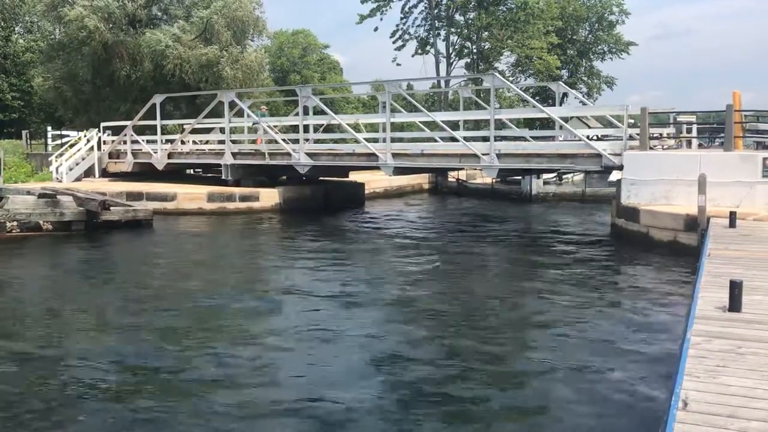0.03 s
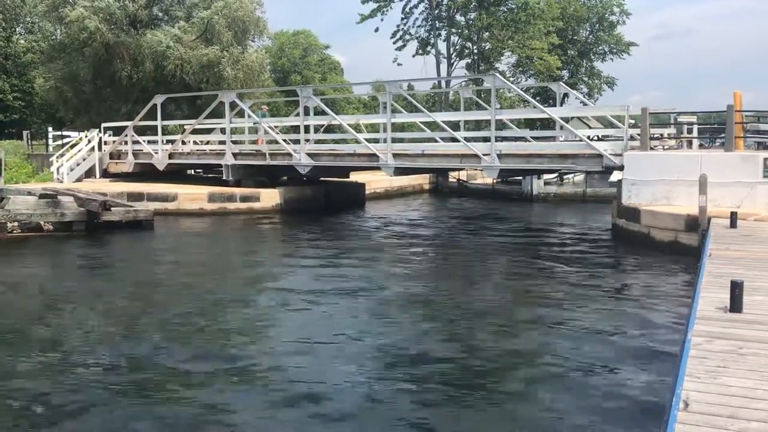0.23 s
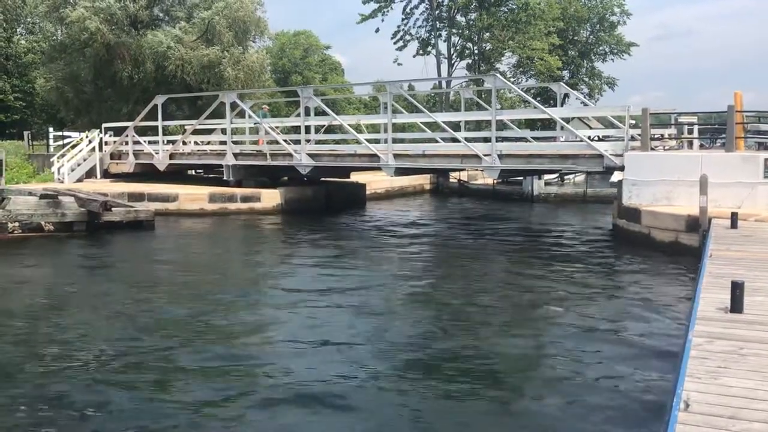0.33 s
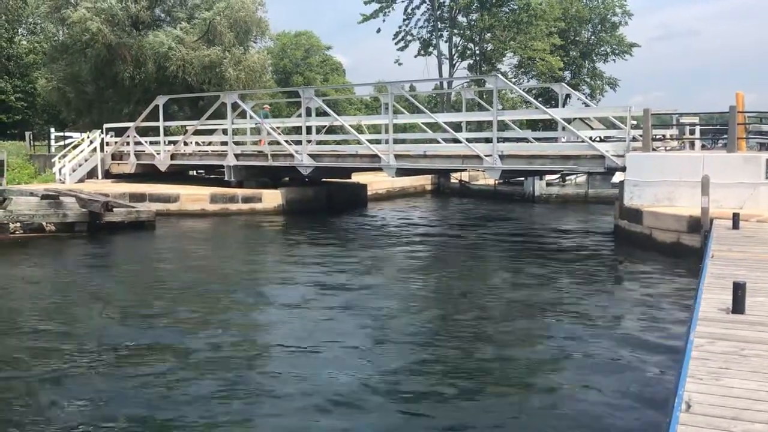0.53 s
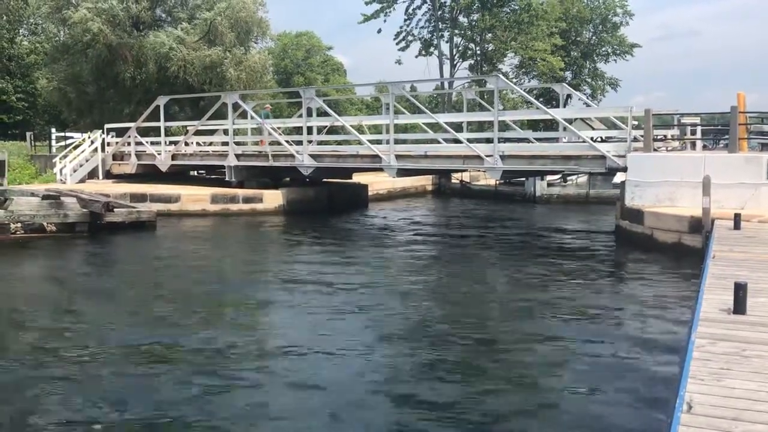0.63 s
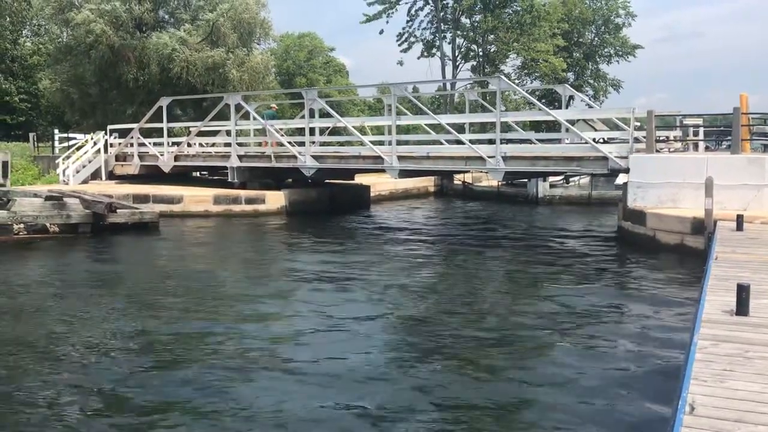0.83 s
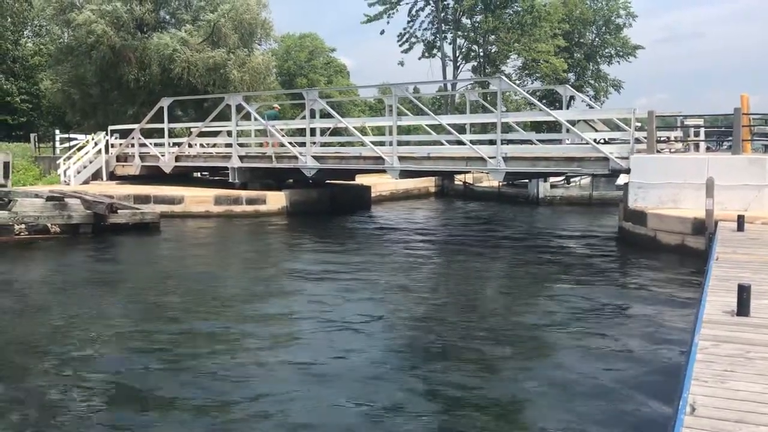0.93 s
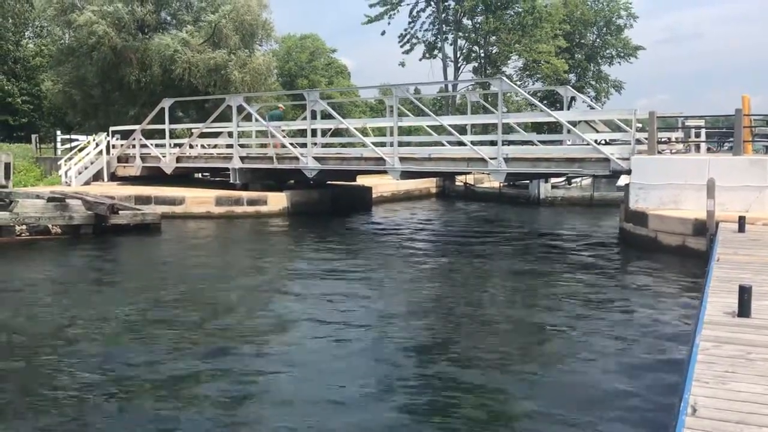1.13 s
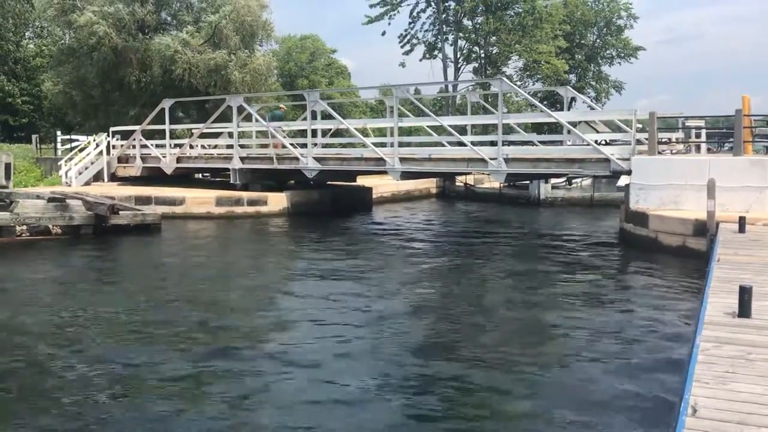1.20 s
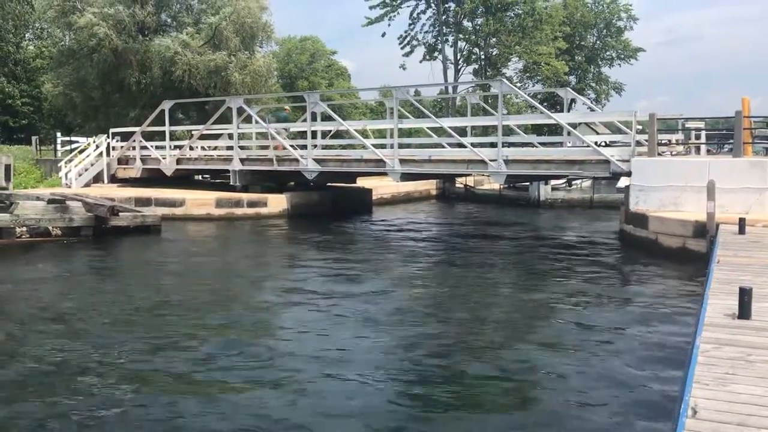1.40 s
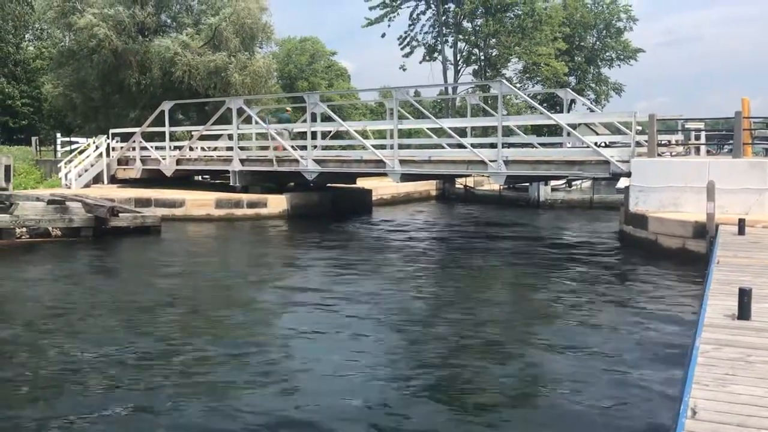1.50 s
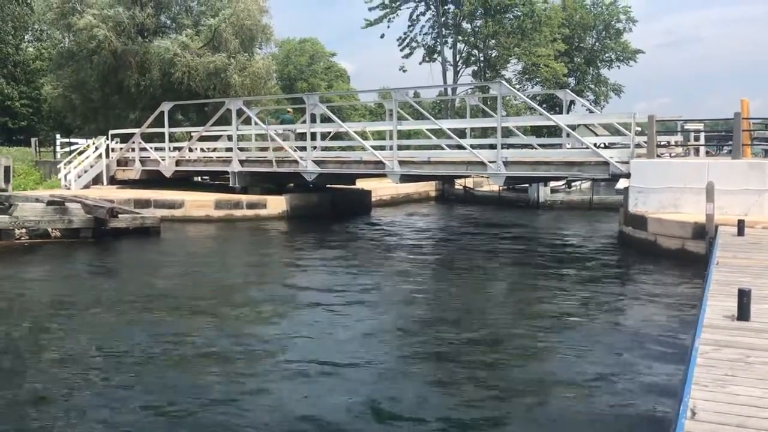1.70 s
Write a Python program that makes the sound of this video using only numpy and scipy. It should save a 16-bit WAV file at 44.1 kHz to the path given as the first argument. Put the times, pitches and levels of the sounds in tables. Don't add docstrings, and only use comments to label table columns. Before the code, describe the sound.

Metal bridge part slams shut with a clanging ring, bounces once, then small metal jingles and ticks

```python
import sys
import numpy as np
from scipy import signal
from scipy.fft import rfft, irfft
from scipy.io import wavfile
from scipy.ndimage import uniform_filter1d

SR = 44100
rng = np.random.default_rng(int(sys.argv[2]) if len(sys.argv) > 2 else 0)


def transcribe(signal):
    frames = np.atleast_2d(signal).T
    limited = np.clip(frames, -1, 1)
    pcm = np.round(limited * 32767).astype(np.int16)
    wavfile.write(sys.argv[1], SR, pcm)


def volts_from_db(level):
    exponent = np.asarray(level, float) / 20
    return 10 ** exponent


N = 77175


def rms_one(x):
    return x / np.sqrt(np.mean(x ** 2) + 1e-20)


def at_hz(points, hz):
    f, db = np.transpose(points)
    return np.interp(np.log(hz), np.log(f), db, left=-60, right=-60)


def curve(rows):
    return np.interp(np.arange(N) / SR, *np.transpose(rows))


def drift(rate):
    r = np.exp(-2 * np.pi * rate / SR)
    noise = rng.standard_normal(N + 20000)
    return rms_one(signal.lfilter([1], [1, -2 * r, r * r], noise)[20000:])


def since(s):
    return np.maximum(np.arange(N) / SR - s, 0)


def clicks_at(times, gains):
    out = np.zeros(N)
    out[(np.asarray(times) * SR).astype(int)] = gains
    return out


def dying(clicks, t60):
    return signal.lfilter([1], [1, -volts_from_db(-60 / (t60 * SR))], clicks)


def soften(level, seconds):
    smooth = np.exp(-1 / (seconds * SR))
    return signal.lfilter([1 - smooth], [1, -smooth], level)


def puff(rows, t60):
    return rng.standard_normal(N) * dying(clicks_at(rows[:, 0], volts_from_db(rows[:, 1])) + 1e-18, t60)


def ring(push, hz, t60):
    r, w = volts_from_db(-60 / (t60 * SR)), 2 * np.pi * hz / SR
    return signal.lfilter([0, np.sin(w)], [1, -2 * r * np.cos(w), r * r], push + 1e-18)


def band_pass(x, low, high):
    return signal.sosfilt(signal.butter(2, [low, high], "band", fs=SR, output="sos"), x)


def bands(streak_db=0):
    edges = 22 * 2 ** np.arange(0, 9.7, 1 / 3)
    white = rfft(rng.standard_normal((2, N)))
    streak_hz = 60
    ripple = uniform_filter1d(rng.standard_normal(white.shape), size=int(streak_hz * N / SR))
    strength = np.minimum(np.arange(N // 2 + 1) * SR / N / 1000, 1)
    white = irfft(white * volts_from_db(streak_db * rms_one(ripple) * strength), N)
    return [(np.sqrt(low * high), band_pass(white[k % 2], low, high))
            for k, (low, high) in enumerate(zip(edges, edges[1:]))]


def coloured(spectrum):
    return rms_one(sum(volts_from_db(at_hz(spectrum, hz)) * b for hz, b in bands()))


# t/s, level/dB, rise/s, decay scale
BLOWS = [
    (0.2316, -18, 0.005, 1),
    (0.3887, -26.5, 0.017, 0.94),
    (0.7, -47, 0.006, 2.36),
    (0.949, -36.5, 0.035, 1.11),
]


def dense_ring():
    # f/Hz, level/dB per Hz
    slam = [(110, -11.5), (200, -5), (600, -8), (1030, -1.5), (1730, -2.5), (2210, -6), (2800, -8),
            (3500, -9), (6500, -23.5), (12500, -31.5), (16000, -37)]
    bounce = [(200, -36), (800, -14.5), (1500, -1), (2200, -1), (3100, 0), (5400, -9), (9000, -20),
              (15500, -84)]
    knock = [(500, -3), (1200, 5), (1900, -4), (3800, -0.5), (6000, -57)]
    last_knock = [(400, -31), (650, -5.5), (1240, -3.5), (1710, -10.5), (2200, -7), (4200, -13.5),
                  (7000, -23.5), (12000, -44)]
    # f/Hz, t60/s
    steel_t60 = [(150, 1.48), (350, 1.1), (700, 0.77), (1400, 0.65), (2800, 0.42), (5600, 0.45),
                 (11000, 0.29), (15000, 0.25)]
    crack_levels = [19, 19, -12, -10]
    low_lag_cycles, crack_s, crack_hz = 2.2, 0.012, 9800
    out, noise = 0, bands(streak_db=2.5)
    t60_hz, t60_s = np.transpose(steel_t60)
    colours = [slam, bounce, knock, last_knock]
    for (s, db, rise, scale), crack_db, colour in zip(BLOWS, crack_levels, colours):
        t = since(s)
        norm = np.sqrt(sum(volts_from_db(at_hz(colour, hz)) ** 2 * np.mean(b ** 2) for hz, b in noise))
        crack = volts_from_db(crack_db) * np.exp(-t / crack_s)
        for hz, b in noise:
            t60 = scale * np.interp(np.log(hz), np.log(t60_hz), t60_s)
            low_lag = low_lag_cycles / hz * 200 / (hz + 200)
            onset = 1 - np.exp(-t / (rise * 1000 / (hz + 1000) + low_lag))
            fall = volts_from_db(-60 * t / t60) + crack / (1 + (crack_hz / hz) ** 2)
            out = out + volts_from_db(db + at_hz(colour, hz)) / norm * onset * fall * b
    return out


def clear_modes():
    steel_hz = [999, 1054, 1175, 1280, 1404, 1611, 3320, 2040, 2105, 2228, 2455, 4190, 4565, 5500]
    mode_t60 = [0.053, 0.4, 0.58, 0.38, 0.56, 0.44, 0.14, 0.24, 0.14, 0.41, 0.36, 0.062, 0.16, 0.46]
    mode_db = [
        [-36, -23.5, -32, -30, -29.5, -34, -42, -29, -24, -30, -38, -48, -37, -42],
        [-53, -67, -43.5, -50, -39, -44.5, -50, -32, -29, -35, -33, -35, -34, -46],
        [-57, -50, -46.5, -43, -49.5, -47, -47, -54, -45.5, -47.5, -52, -38.5, -64, -59],
    ]
    struck = np.array(BLOWS)[[0, 1, 3], 0]
    out = 0
    for hz, t60, dbs in zip(steel_hz, mode_t60, np.transpose(mode_db)):
        swell = soften(dying(clicks_at(struck, volts_from_db(dbs)), t60), 0.011)
        tone = np.sin(2 * np.pi * (hz * np.arange(N) / SR + rng.random()))
        out = out + swell * volts_from_db(2.5 * drift(30)) * tone
    return out


def steel():
    return dense_ring() + clear_modes()


def answers():
    # t/s, peak level/dB, t60/s
    replies = [(.181, -53, 0.23), (.232, -12.5, 0.036), (.234, -13.5, 0.095), (.237, -16.5, 0.24),
               (0.24, -15.5, 0.17), (.248, -28.5, 0.22), (.258, -18.5, 0.04), (0.24, -37, .05),
               (0.27, -17, 0.049), (0.31, -27, 0.079), (0.27, -20, 0.063), (0.24, -27, 0.059),
               (.31, -19, .06), (.31, -36.5, 0.24), (.394, -19.5, 0.12), (.404, -19, 0.071),
               (0.41, -24, 0.066), (0.37, -43, 0.11), (.43, -35, 0.11), (.44, -37, 0.13), (0.45, -33, 0.26),
               (0.45, -40, .08), (0.53, -41.5, 0.42), (.43, -35, .15), (.957, -34, .12), (0.96, -32, .1),
               (.965, -44, 0.085), (1.02, -42, 0.26), (0.98, -38.5, 0.29), (1.03, -41.5, 0.11),
               (1.055, -40, 0.14), (1.3, -51, 0.057), (1.693, -48, 0.055), (1.735, -41.5, 0.0085),
               (1.737, -49, 0.044), (1.1, -52, 0.034), (1.29, -48.5, 0.065), (.865, -42, .012),
               (0.55, -44, 0.046)]
    reply_hz = [2200, 3330, 1000, 2225, 1390, 598, 2230, 4570, 1170, 1470, 3750, 1130, 2230, 245, 2110,
                1900, 5520, 2760, 3480, 2300, 1650, 1620, 358, 4560, 1240, 1250, 2200, 1840, 990, 727, 720,
                1215, 2050, 3750, 2120, 3200, 3080, 2700, 1100]
    twin_ratio, twin_db, rise_share = 1.025, -10, .05
    out = np.zeros(N + SR)
    for (s, db, t60), hz in zip(replies, reply_hz):
        t = np.arange(int(min(t60, .6) * SR)) / SR
        tone = np.sin(2 * np.pi * hz * t) + volts_from_db(twin_db) * np.sin(2 * np.pi * hz * twin_ratio * t)
        rise = 1 - np.exp(-t / (rise_share * t60))
        out[int(s * SR):][:len(t)] += volts_from_db(db - 60 * t / t60) * rise * tone
    return out[:N]


def tinks():
    # t/s, peak level/dB, f/Hz, t60/s
    small_rings = [(0.18, -29.5, 1260, 0.11), (0.194, -44, 1110, 0.073), (0.2252, -33.5, 3400, 0.018),
                   (.222, -31, 1270, 0.079), (0.7991, -36.5, 3095, 0.0095), (.855, -32, 2600, 0.0081),
                   (1.202, -67, 13400, 0.065), (1.211, -53, 14300, 0.092), (1.238, -54, 8500, .04),
                   (1.692, -46.5, 1695, 0.071), (.715, -39.5, 1184, 0.089)]
    out = 0
    for s, db, hz, t60 in small_rings:
        hit = clicks_at([s], volts_from_db(db - 6)) + puff(np.array([(s, db - 24)]), .012)
        pair = ring(hit, hz, t60) + volts_from_db(-2) * ring(hit, hz * 1.045, 0.68 * t60)
        out = out + signal.lfilter(*signal.iirpeak(hz, 2, fs=SR), pair)
    return out


def keys():
    # f/Hz, t60/s
    key_modes = [(5585, .45), (6235, .13), (9110, .1), (10960, .4), (11570, .1)]
    # t/s, then level/dB into each of the first four modes
    jingles = [(0.7514, -39.5, -40, -47, -59), (.766, -47, -57, -44.5, -56), (.777, -42.5, -46, -55, -46),
               (.8, -43, -46, -60, -65), (.812, -43.5, -60, -67, -55), (.855, -61, -63, -70, -57.5),
               (.875, -53, -57, -70, -60), (0.834, -57, -49, -68, -55), (0.9003, -58, -44.5, -71, -53),
               (.9133, -47, -40.5, -68, -44.5), (.93, -51, -53, -60, -56), (.945, -68, -47, -74, -51),
               (.956, -52, -47.5, -64, -59.5), (1.09, -63, -53, -75, -69), (1.437, -64, -53, -72, -70),
               (1.535, -57.5, -64, -71, -77), (1.562, -78, -55, -68, -73), (1.618, -64, -54.5, -75, -72),
               (1.631, -68, -69, -75, -71), (1.662, -70, -55, -75, -71)]
    # t/s, level/dB
    thin_key = [
        (1.47, -69),
        (1.643, -56.5),
    ]
    # t/s, peak level/dB
    snap_rows = [
        (.731, -61),
        (0.753, -30.5),
        (0.768, -26.5),
        (.889, -48),
        (0.9002, -28),
        (.913, -40),
        (1.424, -46.5),
        (1.632, -36.5),
    ]
    wobble_db = [.6, 3, 3.5, 2]
    beat_hz, pair_db, rise_s = 22.28, -6.5, .002
    rows, thin, snaps = np.array(sorted(jingles)), np.array(thin_key), np.array(snap_rows)
    out = ring(clicks_at(thin[:, 0], volts_from_db(thin[:, 1])), *key_modes[-1])
    t = np.arange(N) / SR
    last = np.searchsorted(rows[:, 0], t) - 1
    for k, (hz, t60) in enumerate(key_modes[:-1]):
        level = (last >= 0) * volts_from_db(rows[last, k + 1] - 60 * np.abs(t - rows[last, 0]) / t60)
        twin = volts_from_db(pair_db - 13 * (k == 0)) * np.sin(2 * np.pi * hz * (1 + beat_hz / 6000) * t)
        tone = np.sin(2 * np.pi * hz * t) + twin
        out += soften(level, rise_s) * tone * volts_from_db(wobble_db[k] * drift(85))
    clicks_and_rustle = puff(snaps, .006) + volts_from_db(-18) * puff(snaps, .1)
    return out + band_pass(clicks_and_rustle, 8000 / 1.3, 8000 * 1.3)


def ticks():
    # t/s, peak level/dB
    dry_ticks = [(1.1291, -44), (1.1458, -41), (1.159, -42), (1.1829, -41), (1.1987, -64), (1.232, -41.5),
                 (1.256, -52), (1.293, -49), (1.3351, -40.5), (1.359, -41), (1.381, -50), (1.425, -48),
                 (1.484, -45), (1.514, -44), (1.533, -50), (1.5625, -45), (1.692, -42), (1.7344, -44.5)]
    # f/Hz, level/dB, t60/s
    tick_body = [(2120, -13, 0.027), (3200, 4, 0.0031), (4000, 1, 0.002), (5260, 4.5, 0.0024),
                 (8500, -9, 0.0025)]
    crackle_per_s, crackle_from_s, crackle_db = 45, 1.0, -56
    crackle_length = N / SR - crackle_from_s
    draw = rng.random((int(crackle_per_s * crackle_length), 2))
    faint = np.transpose([crackle_from_s + draw[:, 0] * crackle_length, crackle_db + 8 * draw[:, 1]])
    rows = np.vstack([faint, dry_ticks])
    contact_s = .009
    return sum(volts_from_db(db - 17.5) * ring(puff(rows, contact_s), hz, t60) for hz, db, t60 in tick_body)


def squeaks():
    # start t/s, length/s, level/dB, f/Hz, width/Hz
    squeak_rows = [
        (0.034, 0.08, -61, 6170, 756),
    ]
    # length/s, level/dB
    whistle = (0.031, -49.5)

    def swell(s, length):
        return np.abs(np.sin(np.pi * np.minimum(since(s) / length, 1))) ** .5

    whistle_s, whistle_hz = .891, 2350
    whistle_length, whistle_db = whistle
    tone = np.sin(2 * np.pi * whistle_hz * since(whistle_s))
    out = volts_from_db(whistle_db) * swell(whistle_s, whistle_length) * tone
    for s, length, db, hz, width in squeak_rows:
        hiss = ring(ring(rng.standard_normal(N), hz, 1.8 / width), hz, 1.8 / width)
        out = out + volts_from_db(db) * swell(s, length) * rms_one(hiss)
    return out


def wind():
    # t/s, level/dB
    gusts = [(0, -47), (.12, -56.5), (.145, -39.5), (.19, -47), (.6, -52), (.8, -49), (.87, -36.5),
             (.92, -53), (1.0, -48), (1.12, -51), (1.22, -46), (1.28, -42.5), (1.36, -42), (1.46, -47.5),
             (1.52, -42.5), (1.58, -51.5), (1.67, -46.5), (1.72, -42)]
    # f/Hz, level/dB per Hz
    rumble_colour = [(25, -44), (50, 1), (100, -4.5), (200, -12.5), (400, -38), (700, -19)]
    # t/s, peak level/dB, f/Hz
    buffets = [
        (0.134, -39.5, 145),
        (0.14, -28.5, 78.4),
        (0.834, -25.5, 297),
        (0.845, -26.5, 59.53),
        (.862, -27, 261),
        (0.873, -28.5, 142.4),
        (1.373, -26, 120),
        (1.703, -32.5, 156),
        (1.714, -25.5, 52.7),
    ]
    lump_db, lumps_per_s = 1.2, 16
    rumble = rms_one(coloured(rumble_colour) * volts_from_db(lump_db * drift(lumps_per_s)))
    pushes = sum(volts_from_db(db) * ring(clicks_at([s], 0.64), hz, 8.1 / hz) for s, db, hz in buffets)
    return volts_from_db(curve(gusts)) * rumble + pushes


def air():
    # f/Hz, level/dB per Hz
    air_colour = [(71, -38), (120, -11), (230, -14), (330, -11.5), (460, -20.5), (874, -18), (1790, -23),
                  (6240, -32), (16000, -55)]
    # t/s, level/dB
    air_level = [(0, -57), (.15, -54), (.7, -51.5), (1.15, -51), (1.75, -56)]
    return volts_from_db(curve(air_level) + 0.21 * drift(29.0)) * coloured(air_colour)


def scene():
    mix = steel() + answers() + tinks() + keys() + ticks() + squeaks() + wind() + air()
    return mix[None, :]


def top_cut(x):
    return signal.sosfilt(signal.butter(12, 16620, fs=SR, output="sos"), x)


def record(dry):
    top_hz = 16450
    low_pass = signal.cheby2(12, 50, top_hz, fs=SR, output="sos")
    return top_cut(signal.sosfilt(low_pass, dry))


dry = scene()
out = record(dry)
transcribe(out)
```